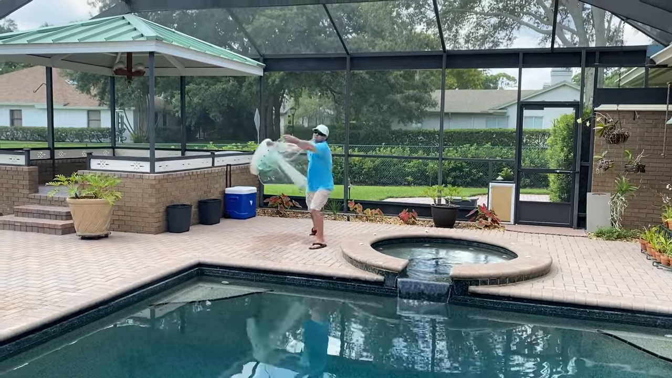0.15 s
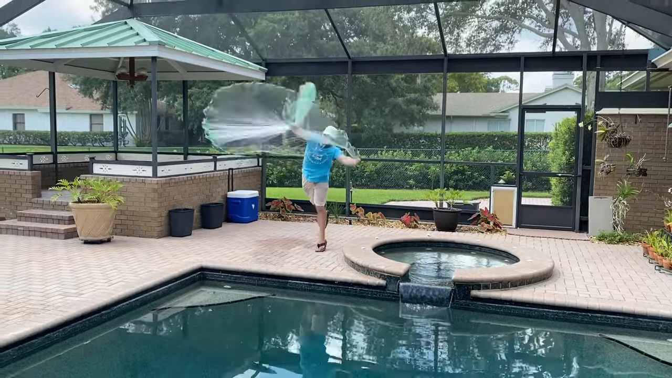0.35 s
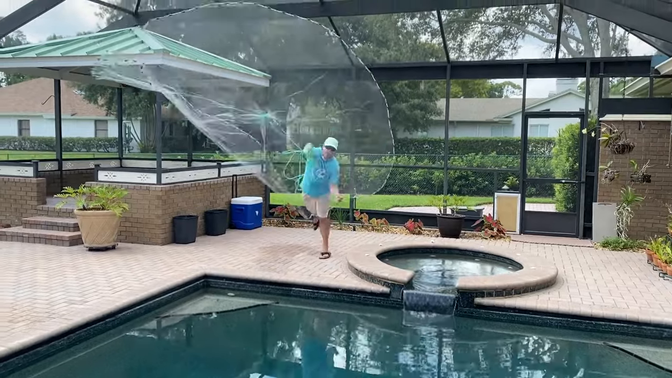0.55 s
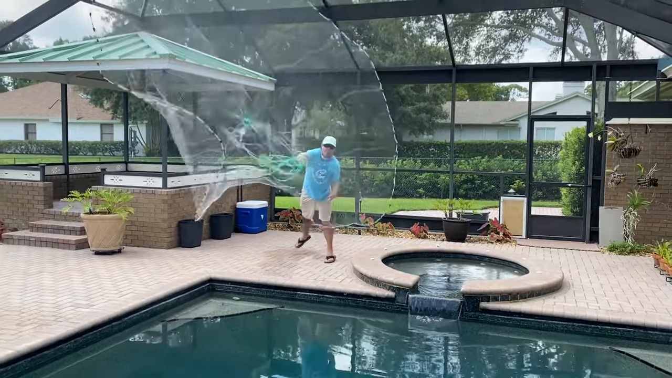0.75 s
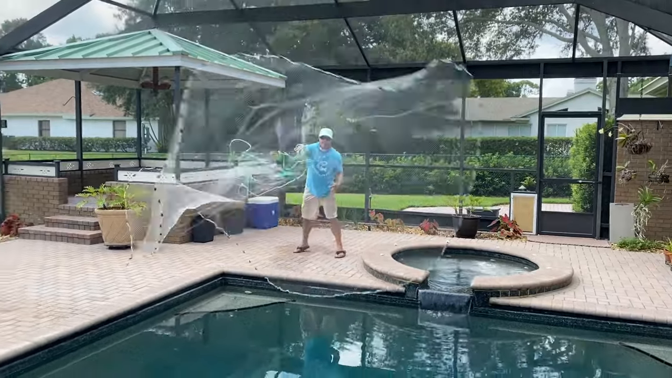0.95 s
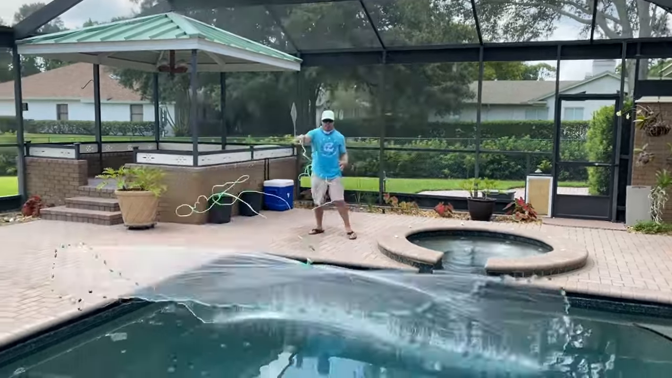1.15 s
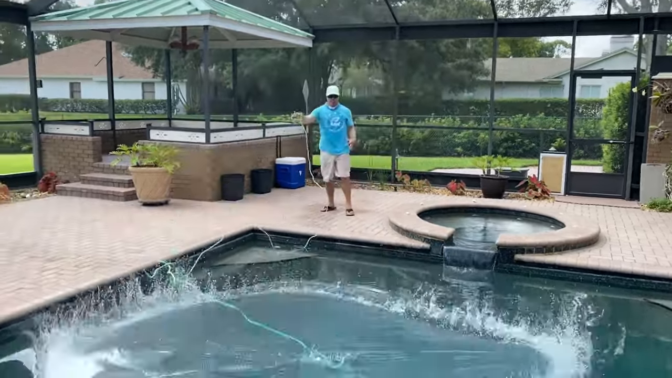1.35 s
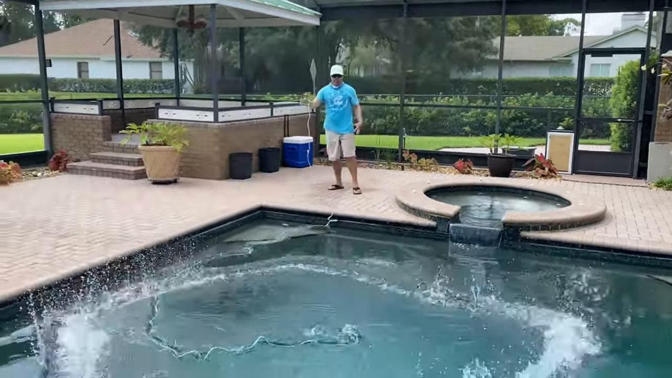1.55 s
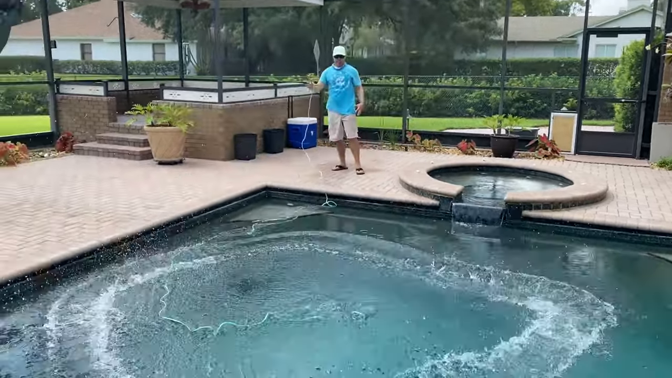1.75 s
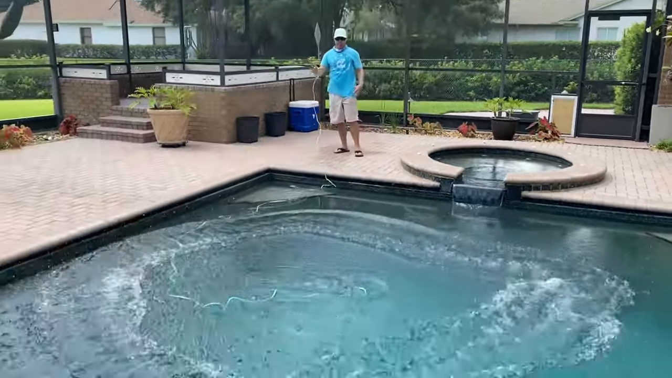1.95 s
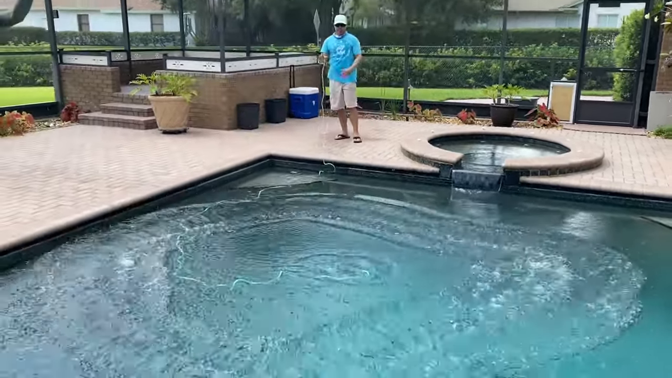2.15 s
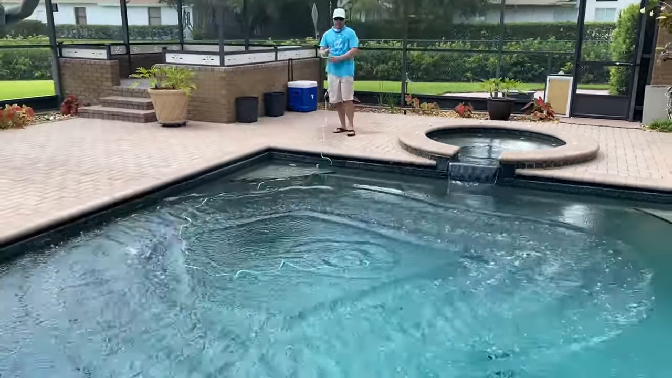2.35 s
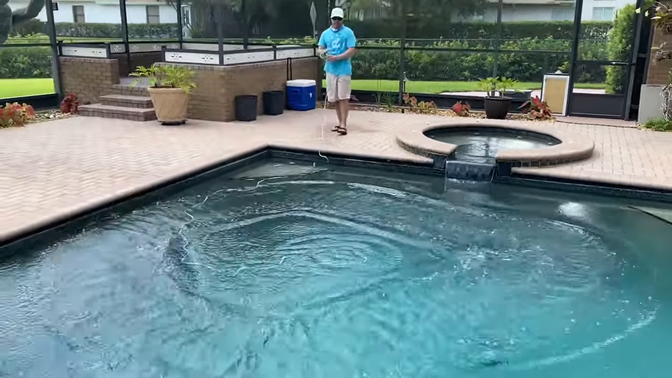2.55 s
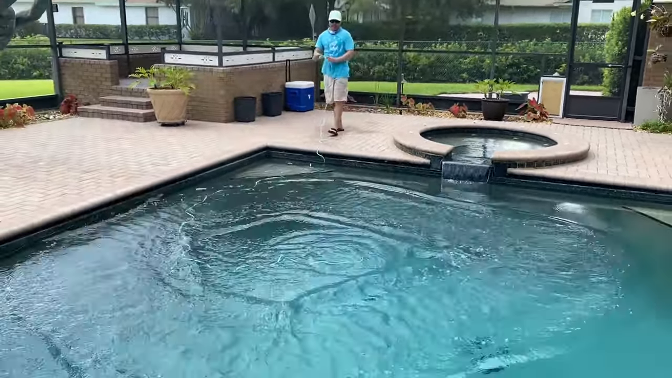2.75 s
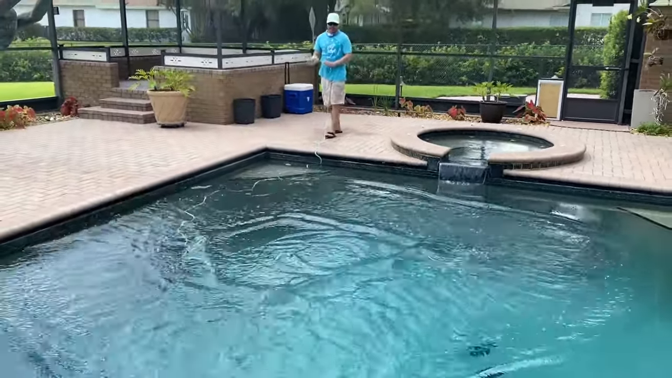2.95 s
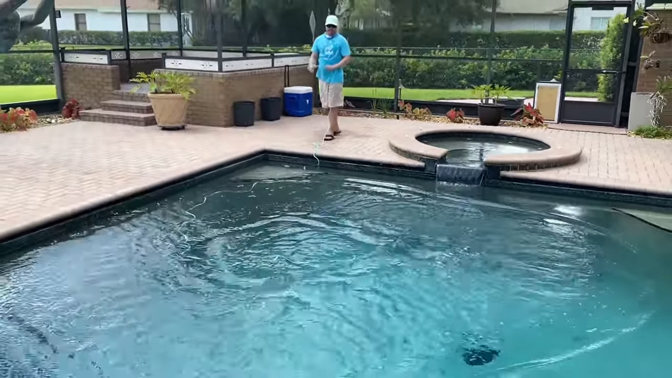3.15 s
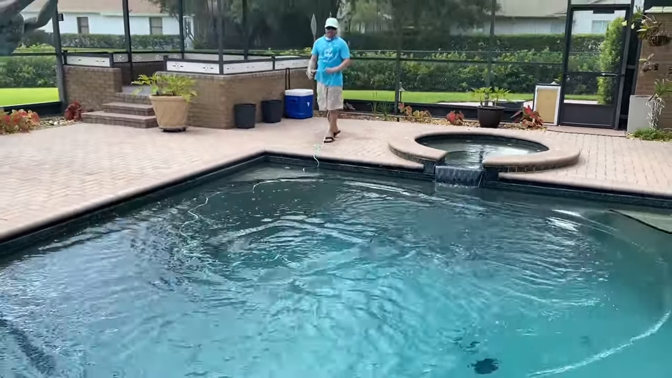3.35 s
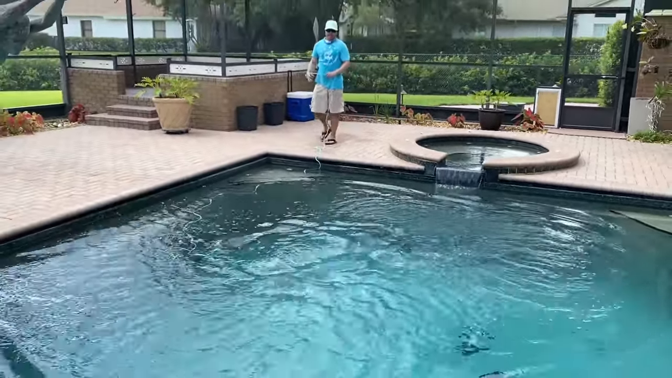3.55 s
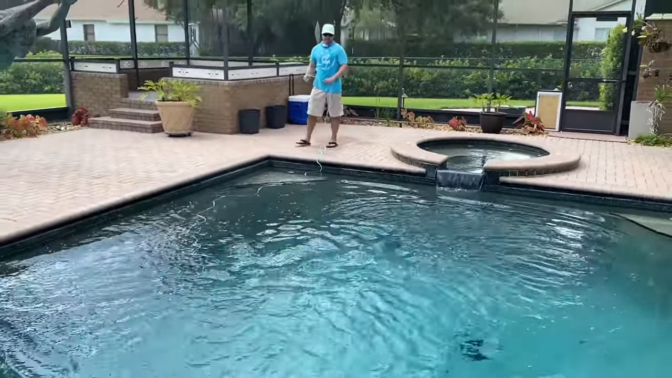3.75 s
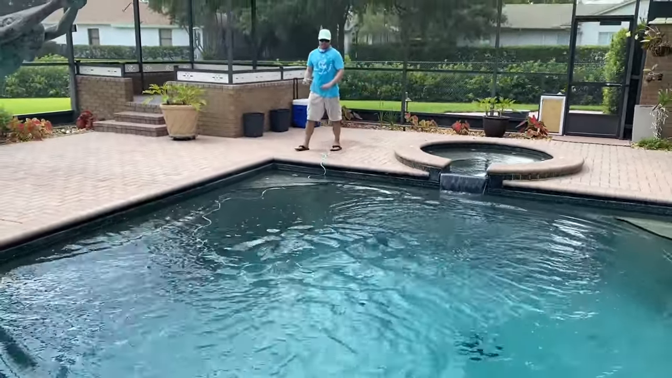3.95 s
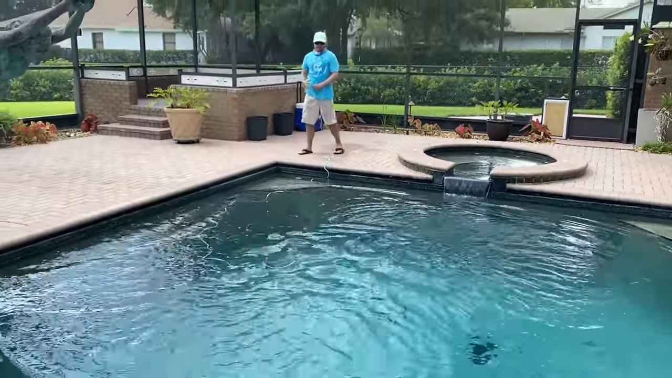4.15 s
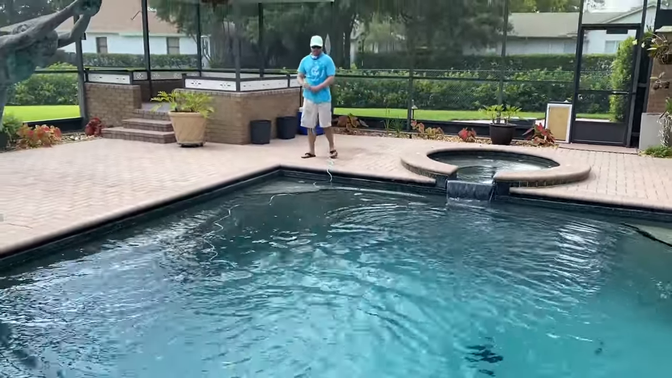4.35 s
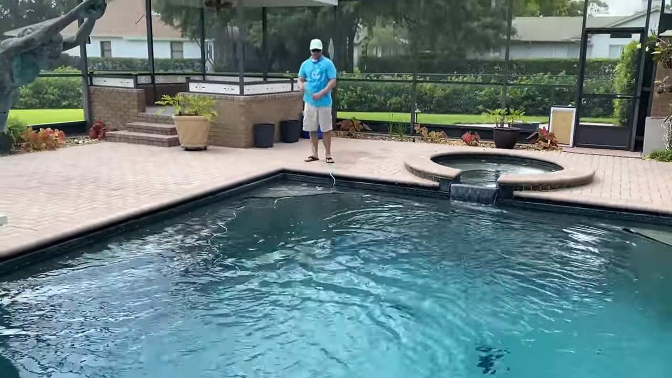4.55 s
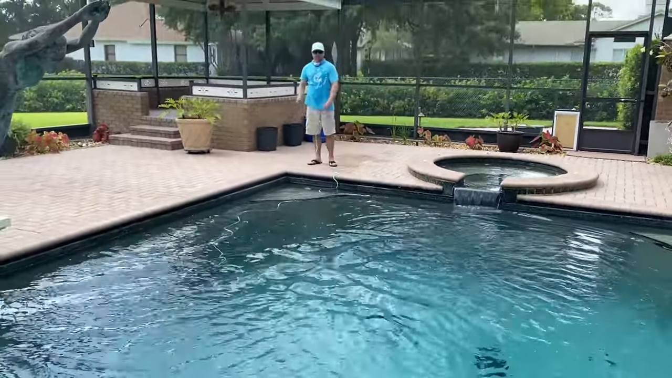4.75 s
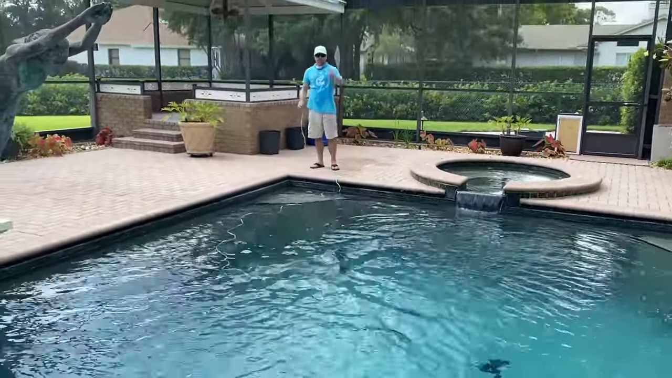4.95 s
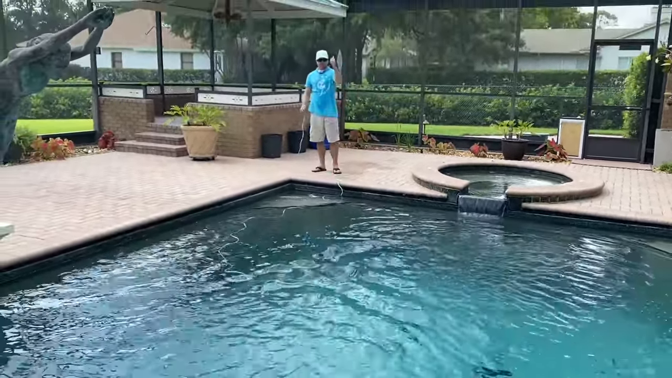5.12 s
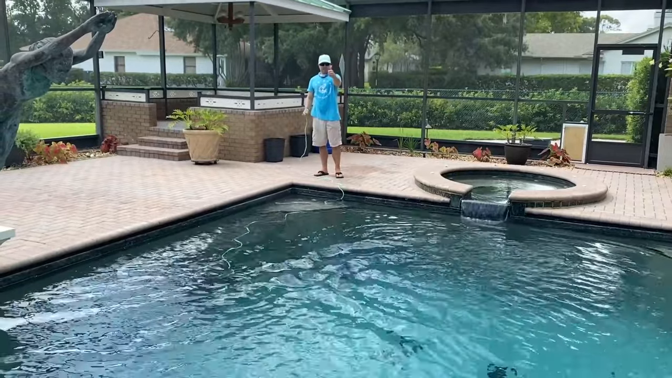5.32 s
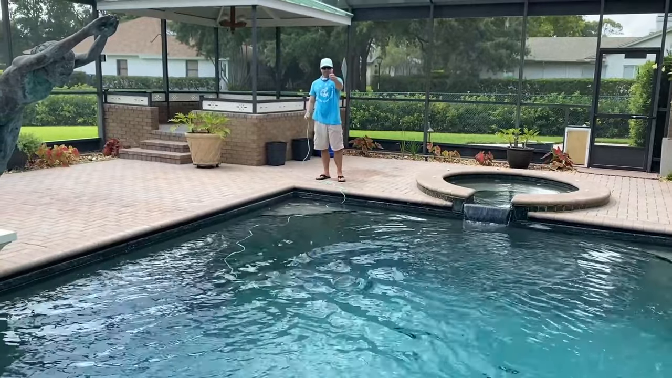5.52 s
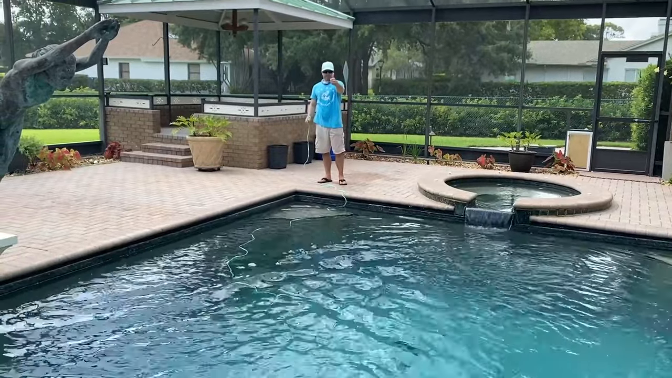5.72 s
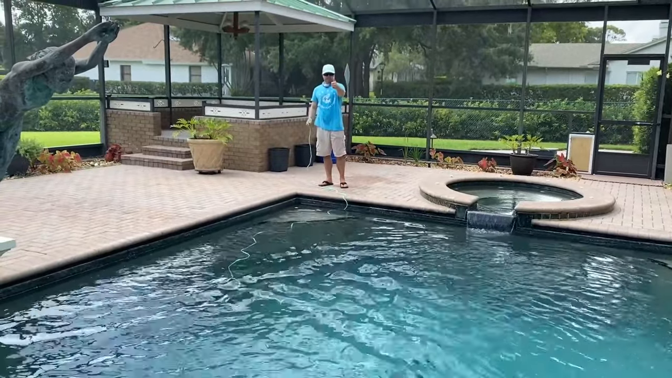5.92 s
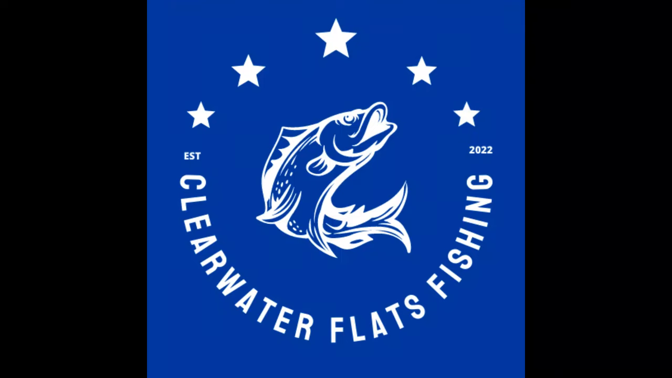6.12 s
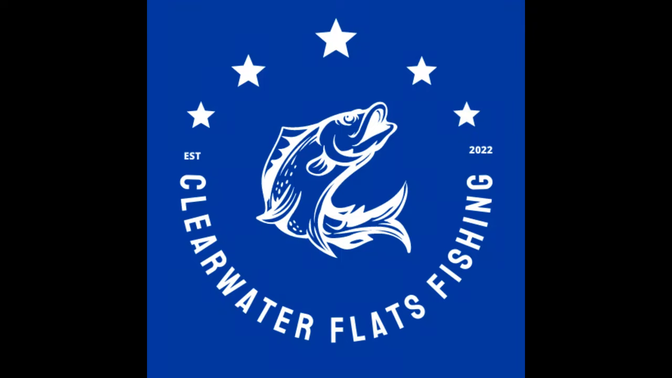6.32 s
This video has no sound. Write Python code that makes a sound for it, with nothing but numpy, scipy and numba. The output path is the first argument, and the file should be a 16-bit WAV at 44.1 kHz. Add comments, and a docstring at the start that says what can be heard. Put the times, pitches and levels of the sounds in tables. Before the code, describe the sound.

On a screened patio, water trickles steadily from a spa over faint pump hum. A net swings and rustles, swooshes open with a small knock and jingle, then its weighted edge hits the pool in a loud, spreading splash. Low gulps and bright spray follow; droplets rain back, foam fizzes away, and scattered plops remain. Phone a few metres away, in stereo, with a short outdoor reflection.

```python
"""Cast net landing on a patio pool

A net is swung, swishes open and lands on a swimming pool in a screened patio, a few metres from a phone:
coloured noise for the air and the cord, showers of tiny damped rings for mesh, water, spray and foam.
Lead weights plunge in one after another; air pockets and bubbles are single rings that rise in pitch.
Throughout, a spa trickles in (ringing drops) over a pump hum (three sines) and a far rumble (noise)."""
import sys
import numpy as np
from scipy import signal
from scipy.fft import rfft, irfft
from scipy.io import wavfile
from scipy.ndimage import uniform_filter1d, map_coordinates
from numba import njit

SR = 44100
rng = np.random.default_rng(int(sys.argv[2]) if len(sys.argv) > 2 else 0)


def unload_wav(signal):
    """Save mono or channel-first audio to the path in sys.argv[1] as 16-bit WAV at rate SR, clipped to [-1, 1]."""
    wavfile.write(
        sys.argv[1],
        SR,
        np.round(np.clip(np.atleast_2d(signal).T, -1, 1) * 32767).astype(np.int16),
    )


N = 285757
TIME = np.arange(N) / SR
FREQS = np.fft.rfftfreq(N, 1 / SR)
PORT_GAP_M, SOUND_M_PER_S = 0.23, 343  # spacing of the two ports, speed of sound
TOP_HZ = 15700  # nothing is heard above this
# the lowest weights skim the water, then the whole ring comes down, one side first
TOUCH_S, LAND_S, LAND_ATTACK_S, RING_S = 1.045, 1.124, 0.02, 0.4
# the thrown-up water rains back: (start, attack, hold) [s]
RAIN = (1.568, 0.1, 0.072)
# fall after the landing [dB per s]
SPLATTER_FALL, SPRAY_FALL = 49, 36
# the air pockets lie a little to the right: one row each for left and right, (level [dB])
POCKET_PAN_DB = [
    [-1.5],
    [0.5],
]


def undb(db):
    """Decibels to gain."""
    return 10 ** (np.asarray(db) / 20)


def curves(table):
    """The columns of a table, joined by straight lines in time."""
    s, *columns = np.transpose(table)
    return [np.interp(TIME, s, c) for c in columns]


def colour(x, points):
    """Filter by a spectrum of (frequency [Hz], gain [dB]) points."""
    hz, db = np.transpose(points)
    gain = undb(np.interp(np.log(FREQS + 1), np.log(hz), db))
    return irfft(rfft(x) * gain, N)


def unit(x):
    """Scale to rms one."""
    return x / np.sqrt(np.mean(x ** 2))


def walk(rate):
    """Random levels of rms one, held 1 / rate s and slewed twice."""
    k = int(SR / rate)
    steps = np.repeat(rng.standard_normal(N // k + 1), k)
    return unit(uniform_filter1d(uniform_filter1d(steps, k), k)[:N])


def envelope(start, attack, hold, fall_db_per_s):
    """A linear attack, a hold, then a steady fall in decibels."""
    age = TIME - start
    return np.clip(age / attack, 0, 1) * undb(-fall_db_per_s * np.maximum(age - attack - hold, 0))


def swell(centre, half):
    """A bell-shaped rise and fall, one at its centre."""
    return np.exp(-.5 * ((TIME - centre) / half) ** 2)


def together(*gains):
    """Unrelated sounds add in power."""
    return np.sqrt(sum(g ** 2 for g in gains))


def diffuse():
    """Noise from all around: alike at both ports in the bass, unrelated in the treble."""
    likeness = .96 * np.sinc(2 * FREQS * PORT_GAP_M / SOUND_M_PER_S)
    mid, side = rfft(rng.standard_normal((2, N))) * np.sqrt([1 + likeness, 1 - likeness])
    return unit(irfft([mid + side, mid - side], N))


@njit
def rings(start, hz, t60, size, glide, onset):
    """A sum of damped sines that build up over `onset` cycles and rise in pitch by `glide` as they die."""
    out = np.zeros(N)
    for k in range(len(start)):
        first = int(start[k] * SR) + 1
        for i in range(max(first, 0), min(first + int(t60[k] * SR), N)):
            t = i / SR - start[k]
            age = t / t60[k]
            build = min(t * hz[k] / onset, 1.)
            cycles = hz[k] * t * (1 + glide[k] * age / 2)
            out[i] += size[k] * build * np.exp(-6.9 * age) * np.sin(2 * np.pi * cycles)
    return out


def placed(start, hz, t60, size, bearing, glide=0., onset=0.25):
    """Rings heard at two ports: a positive bearing reaches the left port first, a negative one the right."""
    lag = bearing * PORT_GAP_M / SOUND_M_PER_S / 2
    glide = glide + np.zeros(len(hz))
    return np.array([rings(start + side * lag, 1. * hz, 1. * t60, 1. * size, glide, float(onset))
                     for side in (-1, 1)])


def droplets(rate, points, cycles, scatter_db, width, glide, onset=0.26):
    """A steady shower of tiny rings of random pitch, life and size, with a given colour and rms one."""
    when, pitch, life, strength, place = rng.random((int(rate * N / SR), 5)).T
    low, high = np.sqrt(points[0][0]), np.sqrt(min(points[-1][0], TOP_HZ))
    hz = (low + (high - low) * pitch) ** 2
    t60 = cycles * 2 ** (2 * life - 1) / hz
    # a positive scatter makes a few rings large, a negative one makes a few small
    excess = -np.log(1 - .985 * strength)
    size = undb(scatter_db * excess) * np.sqrt(np.sqrt(hz) / t60)
    bearing = width * (2 * place - 1) ** 3  # most lie near the middle
    return unit(colour(placed(when * N / SR, hz, t60, size, bearing, glide, onset), points))


def swarms(table, per_s, cycles, glide):
    """Each row is a brief swarm of tiny rings of about one size."""
    grains = []
    for s, db, half, centre, spread in table:
        count = int(per_s * half * np.sqrt(2 * np.pi)) + 1
        when, pitch, place, strength = rng.standard_normal((2048, 4))[:count].T
        hz = np.clip(centre * 2 ** (spread * pitch), 200, TOP_HZ)
        t60 = cycles / hz
        # sizes scatter by 3 dB; shorter and sparser rings are made stronger to hold the level
        size = undb(db) * unit(undb(3 * strength)) * np.sqrt(4 * np.log(1000) / (per_s * t60))
        grains.append([s + half * when, hz, t60, size, .3 * place])
    return placed(*np.hstack(grains), glide=glide, onset=0.72)


def patchy(x, depth_db, per_s, per_octave):
    """Drops come in clumps of like size: each range of pitch swells and sinks on its own."""
    hz, s, cells = signal.stft(x, SR, nperseg=256)
    chance = rng.standard_normal((64, 1024))
    places = np.meshgrid(per_octave * np.log2(1 + hz / hz[1]), per_s * s, indexing="ij")
    gain = undb(depth_db * map_coordinates(chance, places, mode="mirror"))
    return signal.istft(cells * unit(gain), SR)[1][:, :N]


def patio(x, wet_db, t60_low=0.64, t60_high=0.46):
    """House wall, paving and roof return a short diffuse tail, duller as it fades."""
    noise = diffuse()
    low = signal.sosfilt(signal.butter(2, 2500, fs=SR, output="sos"), noise)
    tail = low * undb(-60 * TIME / t60_low) + (noise - low) * undb(-60 * TIME / t60_high)
    tail = (tail * np.clip(TIME / 0.011 - .5, 0, 1))[:, :SR]  # silent for the first 5.5 ms
    tail /= np.sqrt(np.sum(tail ** 2) / 2)
    return x + undb(wet_db) * signal.fftconvolve(x.mean(axis=0)[None], tail, axes=1)[:, :N]


def outdoors():
    """A low, nearly steady rumble from far away: noise from all around, coloured dark."""
    # rumble spectrum: (frequency [Hz], gain [dB])
    rumble_colour = [(20, -30), (35, -14), (55, -4), (80, 2.5), (105, -4.5), (150, -6.5), (200, -12),
                     (280, -8.5), (420, -15.5), (900, -30.5), (3000, -40.5)]
    return unit(colour(diffuse(), rumble_colour)) * undb(-52.5 + .7 * walk(3))


def pump():
    """The motor hums on even multiples of the mains; every line wavers in level, the lower two in phase."""
    # the low line sinks for a while: (time [s], level [dB])
    low_line = [(0, -52.5), (2.4, -49.5), (3.0, -59.5), (3.55, -65), (3.9, -62), (4.9, -60), (5.3, -50),
                (6, -55.5)]
    low_db, = curves(low_line)
    high_db = -67.5 + 9 * swell(centre=3.33, half=0.45)  # the high line comes up once
    mains_hz = 60
    second, fourth, sixth = 2 * np.pi * mains_hz * np.outer([2, 4, 6], TIME)
    hum = undb(low_db + 1.6 * walk(8)) * np.sin(second + 0.52 * walk(3.4))
    hum += undb(-66 + 2 * walk(2.4)) * np.sin(fourth + 0.27 * walk(3.8))
    return hum + undb(high_db + 1.3 * walk(8.7)) * np.sin(sixth)


def spillway():
    """A thin sheet of water falls from the spa: a dense, shifting burble, soft rounder gurgles and a fine fizz."""
    # overflow from the spa: (time [s], level [dB])
    flow = [(0, -58.5), (3.6, -61), (6, -59)]
    # spectra of the burble, gurgles and fizz: (frequency [Hz], gain [dB])
    burble_colour = [(300, -19), (540, -4), (700, -11.5), (800, -6), (1030, -15), (1200, -5.5), (1370, -17),
                     (1680, -14.5), (1850, -6.5), (2250, -14), (2850, -16), (5100, -18.5), (6300, -23.5),
                     (8000, -20.5)]
    gurgle_colour = [(350, -4.5), (550, -3.5), (800, -5), (980, -9), (1200, 2), (1500, -4.5), (1850, -3),
                     (2200, -7.5), (2900, -14.5), (4200, -11.5), (5000, -21)]
    fizz_colour = [(4000, -11.5), (6300, 0), (7500, -9.5), (10500, 5), (12500, -4), (16000, -10)]
    flow_db, = curves(flow)
    burble = droplets(rate=3400, points=burble_colour, cycles=54, scatter_db=1.6, width=.8,
                      glide=0.099, onset=2.6)
    gurgles = droplets(rate=420, points=gurgle_colour, cycles=53, scatter_db=1.15, width=0.94,
                       glide=0.08, onset=5.2)
    fizz = droplets(rate=2700, points=fizz_colour, cycles=7.1, scatter_db=4.5, width=0.38, glide=0)
    water = burble * undb(-.5 + 0.7 * walk(16))
    water += gurgles * undb(-3.5 + 0.72 * walk(7.9))
    water += fizz * undb(-14.5 + 1.0 * walk(7.9))
    return patchy(water, depth_db=2.24, per_s=16, per_octave=3.014) * undb(flow_db)


def singing():
    """A faint thin band of hiss flickers as the throw begins, then fades."""
    # narrow hiss spectrum: (frequency [Hz], gain [dB])
    hiss_colour = [(1700, -24), (2000, -9), (2120, 6), (2300, -6), (2700, -26)]
    fade = envelope(0, attack=.01, hold=0.27, fall_db_per_s=89)
    return unit(colour(diffuse(), hiss_colour)) * undb(-64 + 2 * walk(25)) * fade


def throw():
    """Nylon mesh rustles and flutters over itself, most as it spreads, and the opening net stirs the air."""
    # spectra of the mesh and of the stirred air: (frequency [Hz], gain [dB])
    mesh_colour = [(1200, -14.5), (2300, -3.5), (3300, -6), (6000, 0.5), (8000, -2), (11500, -2.5),
                   (16000, -6.5)]
    air_colour = [(100, 0.5), (250, -3), (550, -7.5), (1300, -10), (2500, -9.5), (6000, -43)]
    # folds of mesh jerk free and rasp:
    # (time [s], level [dB], half length [s], centre [Hz], spread [octaves])
    tugs = [(.195, -52.5, 0.019, 6460, .55), (.295, -51.5, .014, 1102, .3), (.325, -52, .004, 11500, .3),
            (.345, -46, .006, 12500, .25), (.345, -54, 0.013, 5990, .5), (.368, -51, 0.015, 2303, .2),
            (.482, -49, .01, 752, .3), (.595, -47, .009, 8020, .4), (.596, -53.5, 0.015, 795, .8),
            (.46, -48.5, 0.022, 11000, .15), (.702, -51.5, 0.01, 8500, .4), (.74, -54.5, 0.018, 7000, .7),
            (.96, -53, 0.016, 1697, .35), (1.0, -63.5, 0.033, 9500, .45), (1.04, -55, 0.019, 2200, .25)]
    release_s, spread_s, glide_s = 0.136, 0.45, 1  # mesh pays out, spreads, then glides down
    airborne = np.clip((LAND_S - TIME) / LAND_ATTACK_S, 0, 1)
    released = np.clip((TIME - release_s) / .023, 0, 1)
    rubbing = released * together(undb(-50.5) * swell(spread_s, half=0.15), undb(-78.5))
    stirring = together(
        undb(-58) * envelope(0, 0.008, spread_s, fall_db_per_s=26.5),  # arm swings
        undb(-49.5) * swell(0.202, half=0.015),  # bundle whips past the shoulder
        undb(-48.5) * swell(.505, half=0.039),  # net swooshes open
        undb(-58) * np.clip((TIME - glide_s) / .03, 0, 1))  # net glides down
    strands = droplets(rate=9000, points=mesh_colour, cycles=6, scatter_db=2, width=.4, glide=0)
    mesh = patchy(strands, depth_db=2.7, per_s=80, per_octave=1.7) * rubbing * undb(0.7 * walk(66))
    air = unit(colour(diffuse(), air_colour)) * stirring * undb(1.0 * walk(31))
    return (mesh + air) * airborne + swarms(tugs, per_s=6500, cycles=7, glide=0)


def slaps():
    """Line, mesh and drops slap and tick: short, strongly damped smacks."""
    # sharp slaps and ticks, before a 9 dB lift: (time [s], level [dB], centre [Hz])
    smack_list = [(.024, -46, 563), (.157, -35, 2040), (.326, -35, 14500), (.347, -42.5, 1500),
                  (.515, -42, 675), (0.794, -42, 2500), (.814, -45, 2790), (1.056, -41, 6380),
                  (1.128, -26.5, 1100), (1.136, -23, 943), (1.144, -21, 803), (1.154, -21.5, 674),
                  (1.168, -20.5, 860), (1.219, -21.5, 1500), (1.2237, -19, 1393), (1.264, -26.5, 6200),
                  (1.309, -21, 626), (1.329, -17.5, 11300), (1.352, -22.5, 2408), (1.493, -26, 3620),
                  (1.711, -28, 11600), (2.232, -31, 11700), (2.259, -50, 775), (2.293, -47, 1160),
                  (4.06, -46, 1400), (4.062, -49, 720), (4.236, -50, 1700), (4.442, -39, 1850),
                  (5.270, -38, 14500), (5.467, -37, 11500)]
    s, db, hz = np.transpose(smack_list)
    return placed(s, hz, 7.4 / hz, undb(db + 9.0), bearing=0.046, onset=1.0)


def hand_line():
    """The cord hisses softly as its coils pay out after the net."""
    # cord hiss spectrum: (frequency [Hz], gain [dB])
    cord_colour = [(1500, -14), (3000, -1.5), (4300, -1), (5200, -2), (7000, -24)]
    return unit(colour(diffuse(), cord_colour)) * undb(-58 + 2.0 * walk(40.2)) * swell(0.9, half=0.36)


def tackle():
    """Two weights knock dully, then the swivel jingles, each touch at a slightly different pitch."""
    # lead weights knock together in flight: (time [s], level [dB])
    knock_list = [(0.6807, -34), (0.682, -30.5)]
    # what a weight rings with: (frequency [Hz], level [dB])
    lead_modes = [(3200, -5.5), (7000, -4), (8200, -3), (10500, -2.5), (11700, -6.5), (14400, -3)]
    # the swivel on the hand line jingles: (time [s], level [dB])
    jingle_list = [(.694, -44), (.701, -41.5), (.745, -48), (.774, -55)]
    lead_t60_s, swivel_hz, swivel_t60_s = .005, 4980, .08  # lead is dead: its modes are gone at once
    knocks = [(s, hz, lead_t60_s, db + mode_db) for s, db in knock_list for hz, mode_db in lead_modes]
    jingles = [(s, swivel_hz * (1 + 0.0091 * rng.standard_normal()), swivel_t60_s, db)
               for s, db in jingle_list]
    s, hz, t60, db = np.transpose(knocks + jingles)
    return placed(s, hz, t60, undb(db), bearing=0.03)


def plops():
    """Each bubble swells over a cycle or so and rises a little in pitch as it dies."""
    # loudest single bubbles, in the foam and along the pool edge, before a 1 dB lift:
    # (time [s], level [dB], pitch [Hz], ring time [s])
    bubble_list = [(.99, -43.5, 1240, 0.049), (1.364, -24, 1882, 0.017), (1.367, -10.5, 2364, .012),
                   (1.346, -21, 800, .025), (1.382, -18, 713, 0.027), (1.569, -26.5, 940, 0.039),
                   (1.593, -24, 840, 0.044), (1.622, -24, 798, 0.043), (1.663, -24, 950, 0.042),
                   (1.676, -22, 1620, .02), (1.843, -23.5, 1610, 0.016), (1.875, -24, 1860, .018),
                   (1.897, -24.5, 917, 0.033), (1.939, -29.5, 617, 0.028), (1.96, -32, 1550, .02),
                   (2.023, -31, 880, 0.02), (2.073, -38.5, 2200, 0.047), (2.081, -38, 1300, .02),
                   (2.16, -42, 2090, .016), (2.259, -43, 2550, 0.019), (2.357, -46.5, 1130, .03),
                   (2.385, -52, 954, 0.063), (2.40, -49, 630, 0.071), (2.43, -49, 796, 0.057),
                   (2.50, -50.5, 798, 0.15), (2.565, -56, 810, 0.064), (2.54, -47, 2460, 0.027),
                   (2.625, -49.5, 556, 0.094), (2.68, -51, 1270, .04), (2.788, -46, 1135, 0.049),
                   (2.964, -42.5, 1460, 0.024), (3.062, -50, 1440, .03), (3.161, -43, 1700, .026),
                   (3.23, -48, 970, 0.047), (3.266, -56, 1120, .035), (3.321, -43.5, 637, 0.082),
                   (3.49, -51, 720, .04), (3.783, -51, 1820, .06), (3.86, -50, 2640, .04),
                   (3.875, -45, 531, 0.063), (4.148, -48, 1806, 0.15), (4.235, -49.5, 1230, 0.1),
                   (4.302, -42, 597, 0.038), (4.318, -49, 680, .04), (4.345, -48, 1190, 0.063),
                   (4.495, -43, 767, .04), (4.603, -45, 566, 0.049), (4.644, -47, 514, 0.044),
                   (4.646, -49.5, 1142, 0.16), (4.745, -57, 1150, .04), (4.778, -41.5, 630, 0.032),
                   (4.795, -47, 790, 0.038), (4.914, -41.5, 597, 0.034), (4.995, -45.5, 524, 0.099),
                   (5.036, -48, 510, 0.049), (5.195, -45.5, 1205, 0.073), (5.199, -44, 4220, .025),
                   (5.222, -53, 4380, 0.036), (5.26, -53, 4230, 0.14), (5.318, -38, 550, 0.036),
                   (5.326, -40, 3900, 0.024), (5.43, -45, 800, 0.036), (5.606, -48, 635, 0.043),
                   (5.679, -43.5, 560, 0.04), (5.708, -51, 830, 0.069), (5.907, -37, 532, 0.055),
                   (5.922, -40.5, 914, 0.022), (6.012, -41.5, 541, 0.044)]
    s, db, hz, t60 = np.transpose(bubble_list)
    return placed(s, hz, t60, undb(db + 1.0), bearing=0.22, glide=.04, onset=1.4)


def smack_gains():
    """Brief surges where stretches of the ring land at once: gains of the splatter and of the spray."""
    # stretches of the ring smack down together: (time [s], splatter level [dB], spray level [dB])
    stretches = [(1.152, -30.5, -56.5), (1.215, -37, -49.5), (1.283, -34, -44.5), (1.356, -32, -44),
                 (1.495, -31, -38.5)]
    return together(*[undb([[db], [spray_db]]) * swell(s, half=0.015) for s, db, spray_db in stretches])


def splatter_gain():
    """Water is skimmed, struck by the ring of weights, then struck again by the drops that it threw up."""
    return together(
        undb(-58) * envelope(TOUCH_S, 0.033, LAND_S - TOUCH_S, SPLATTER_FALL),
        smack_gains()[0],
        undb(-33.5) * envelope(LAND_S, LAND_ATTACK_S, RING_S, SPLATTER_FALL),
        undb(-34.5) * envelope(*RAIN, fall_db_per_s=62.5))


def gulp_gain():
    """Pockets pinch off behind the weights and drop off sharply after the main run; smaller ones keep rising."""
    pinch_s, attack_s, hold_s = 0.047, 0.055, 0.309
    pockets = (LAND_S + pinch_s, attack_s, hold_s)
    return together(undb(-31) * envelope(*pockets, fall_db_per_s=397),
                    undb(-46) * envelope(*pockets, fall_db_per_s=55))


def spray_gain():
    """Fine spray from the first touch, the landing, its crown, the falling mist and the bursting foam."""
    return together(
        undb(-48.5) * envelope(TOUCH_S, 0.013, LAND_S - TOUCH_S, SPRAY_FALL),
        undb(-41) * envelope(LAND_S, LAND_ATTACK_S, RING_S, SPRAY_FALL),
        undb(-37.5) * swell(1.32, half=0.066),  # crown, thickest halfway round the ring
        smack_gains()[1],
        undb(-37) * envelope(*RAIN, fall_db_per_s=65),  # mist
        undb(-53) * envelope(*RAIN, fall_db_per_s=10.5))  # foam


def splash():
    """Mesh and weights splatter into the water, air pockets gulp, and fine spray falls back as fizz."""
    # spectra of impacts, ringing bubbles, gulps and spray: (frequency [Hz], gain [dB])
    impact_colour = [(200, -23), (450, -7.5), (650, 1), (1000, -9), (1500, -6), (2200, -8.5), (3000, -15.5),
                     (4500, -27), (8000, -25.5)]
    bubble_colour = [(200, -25), (450, -8.5), (650, -5.5), (950, -4), (1500, -4), (2200, -9.5),
                     (3000, -14.5), (4500, -24.5), (8000, -27)]
    gulp_colour = [(60, -36), (130, -17.5), (200, -9), (290, -0.5), (400, -2.5), (490, -8.5), (900, -15.5)]
    spray_colour = [(1500, -9.5), (3000, -3.5), (4900, -2), (7000, -7.5), (8800, -8), (11500, -5),
                    (14000, -6.5), (16000, -7.5)]
    clumps = walk(55)  # water lands in sheets and clots
    impacts = droplets(rate=1800, points=impact_colour, cycles=5.2, scatter_db=1.7, width=1.3,
                       glide=0, onset=0.62)
    bubbles = droplets(rate=1800, points=bubble_colour, cycles=30, scatter_db=1.0, width=0.87,
                       glide=0.12, onset=0.68)
    # first the surface is struck; later the drops that rain back leave ringing bubbles
    bubbly = np.interp(TIME, [1.2, 1.9], [.4, .75])
    splatter = (np.sqrt(1 - bubbly) * impacts + np.sqrt(bubbly) * bubbles) * undb(0.46 * clumps)
    splatter = patchy(splatter, depth_db=1.5, per_s=70, per_octave=2.5)
    gulps = droplets(rate=900, points=gulp_colour, cycles=7.2, scatter_db=-1, width=1.0,
                     glide=0.11, onset=0.93)
    gulps = gulps * undb(1.9 * walk(45) + np.array(POCKET_PAN_DB))  # in clumps
    spray = droplets(rate=6000, points=spray_colour, cycles=3.8, scatter_db=-1.0, width=.6, glide=.1)
    spray = patchy(spray * undb(0.97 * clumps), depth_db=2.05, per_s=70, per_octave=3.97)
    return splatter * splatter_gain() + gulps * gulp_gain() + spray * spray_gain()


def small_splashes():
    """Each is a brief swarm of ringing drops and bubbles."""
    # the first weights skim, the ring lands, clots of water fall back, later wavelets break on the
    # pool wall: (time [s], level [dB], half length [s], centre [Hz], spread [octaves])
    splash_list = [(1.056, -52.5, 0.0061, 780, 0.26), (1.1, -45.5, 0.0099, 2000, 0.28),
                   (1.15, -33, .014, 1100, 0.36), (1.217, -32.5, .009, 1610, 0.3),
                   (1.273, -38.5, 0.0076, 5300, 0.11), (1.28, -44, .008, 1630, 0.19),
                   (1.327, -36, 0.0047, 5550, .15), (1.343, -36, .003, 3800, .6),
                   (1.355, -31, .014, 2100, .45), (1.425, -34, .007, 1606, .4),
                   (1.463, -38, 0.0062, 2330, 0.18), (1.582, -34, 0.0096, 1350, 0.26),
                   (1.644, -35.5, .01, 2073, 0.43), (1.691, -36, .014, 776, 0.12),
                   (1.68, -35, 0.0087, 1620, 0.18), (1.741, -34, 0.021, 2160, 0.17),
                   (1.78, -36.5, 0.0054, 1310, 0.42), (1.883, -35, 0.0058, 1830, 0.24),
                   (1.948, -43, 0.019, 1940, 0.28), (2.032, -47, 0.013, 1104, 0.46),
                   (2.11, -53.5, 0.04, 1800, 0.34), (2.242, -57, 0.0057, 6000, 0.51),
                   (2.262, -59, 0.0053, 2470, 0.18), (2.288, -64, 0.0056, 4100, 0.22),
                   (2.485, -56, 0.0048, 2040, .25), (2.543, -58, 0.0084, 2400, 0.12),
                   (2.589, -59, 0.0048, 4600, 0.18), (2.669, -60, .006, 11400, .15),
                   (2.695, -55, .018, 2600, 0.26), (2.726, -57, 0.0096, 3800, 0.096),
                   (2.834, -60, .007, 4030, .15), (2.979, -64, .005, 7100, .15),
                   (3.004, -59, .008, 2260, 0.17), (3.274, -59.5, 0.02, 3400, 0.13),
                   (3.398, -58, 0.0028, 8500, 0.5), (3.43, -61, 0.011, 2500, 0.64),
                   (3.684, -56.5, 0.011, 1900, 0.22), (3.75, -55, 0.011, 1380, 0.42),
                   (3.746, -61.5, 0.0094, 6700, 0.38), (3.87, -64, 0.018, 2700, .13),
                   (3.993, -59.5, 0.013, 2560, 0.16), (4.065, -57.5, 0.0036, 3000, 0.61),
                   (4.397, -56, .022, 1620, 0.42), (4.47, -54.5, 0.02, 4340, 0.61),
                   (4.487, -52, 0.025, 2150, 0.33), (4.618, -62, .007, 11400, .12),
                   (4.891, -53, 0.0078, 2400, 0.28), (5.07, -58.5, 0.0056, 6960, 0.19),
                   (5.11, -61, 0.16, 3560, 0.3), (5.221, -62, 0.016, 2300, 0.34),
                   (5.409, -60.5, 0.027, 1940, 0.1), (5.567, -62, 0.0082, 3030, 0.098),
                   (5.768, -61, 0.0064, 3200, 0.11), (5.772, -61, .006, 6400, 0.18),
                   (5.84, -60, 0.031, 1970, 0.12)]
    return swarms(splash_list, per_s=2000, cycles=28, glide=.08)


def plunges():
    """Each big air pocket swells for nearly two cycles, then throbs briefly as its pitch rises."""
    # biggest air pockets pulled under by the weights, before a 5.5 dB lift and the pan:
    # (time [s], level [dB], pitch [Hz])
    pocket_list = [(1.143, -32.5, 270), (1.176, -20.5, 257), (1.197, -23, 216), (1.218, -22.5, 210),
                   (1.247, -14.5, 346), (1.282, -17, 324), (1.296, -16, 277), (1.347, -14, 314),
                   (1.363, -13, 285), (1.379, -25, 378), (1.415, -15.5, 298), (1.455, -16.5, 378),
                   (1.485, -11, 299), (1.507, -15.5, 392), (1.524, -17.5, 282), (1.538, -21, 287),
                   (1.636, -27.5, 339), (1.865, -39.5, 260), (1.885, -32, 409)]
    s, db, hz = np.transpose(pocket_list)
    pockets = placed(s, hz, 11.1 / hz, undb(db + 5.5), bearing=0.21, glide=0.081, onset=1.72)
    return pockets * undb(POCKET_PAN_DB)


def chirps():
    """A bubble that opens at the surface shoots up in pitch."""
    # bubbles that break the surface, before a 0.5 dB lift:
    # (time [s], level [dB], starting pitch [Hz], sweep [Hz per s])
    sweep_list = [(1.808, -25.5, 689, 42000), (2.013, -36.5, 581, 12000)]
    s, db, hz, sweep = np.transpose(sweep_list)
    t60_s = 0.053
    return placed(s, hz, np.full(len(s), t60_s), undb(db + 0.5), bearing=.1,
                  glide=sweep * t60_s / hz, onset=2.3)


def widen(x, lag_s=.000244, in_phase_hz=11250):
    """The phone's stereo: in the treble the left channel is mostly a late, phase-turned copy of the right."""
    # left port's tone: (frequency [Hz], gain [dB])
    left_tone = [(60, -.5), (700, -1), (2400, 0), (4400, 2.2), (7000, 0.5), (16000, 0)]
    left, right = rfft(x)
    share = np.interp(FREQS, [4500, 7500], [0, .93])
    copy = right * np.exp(-2j * np.pi * (FREQS - in_phase_hz) * lag_s)
    left, right = irfft([np.sqrt(1 - share ** 2) * left + share * copy, right], N)
    return np.array([colour(left, left_tone), right])


def scene():
    """Net and water on the patio, over pump and rumble."""
    near = patio(splash() + slaps() + small_splashes(), wet_db=-4.0)
    near += patio(tackle() + plops() + chirps(), wet_db=-3)
    near += patio(plunges(), wet_db=-8.5)
    far = patio(throw() + hand_line() + spillway(), wet_db=-3.0)
    return near + far + singing() + pump() + outdoors()


def record(dry):
    """The phone thins the deep bass, widens the treble and cuts the top; the sound stops dead near the end."""
    thin = signal.sosfilt(signal.butter(2, 30, "highpass", fs=SR, output="sos"), widen(dry))
    stop_s = 6.031
    stop = np.exp(-np.maximum(TIME - stop_s, 0) / .003)
    return signal.sosfilt(signal.ellip(10, .2, 80, TOP_HZ, fs=SR, output="sos"), thin * stop)


dry = scene()
out = record(dry)
unload_wav(out)
```